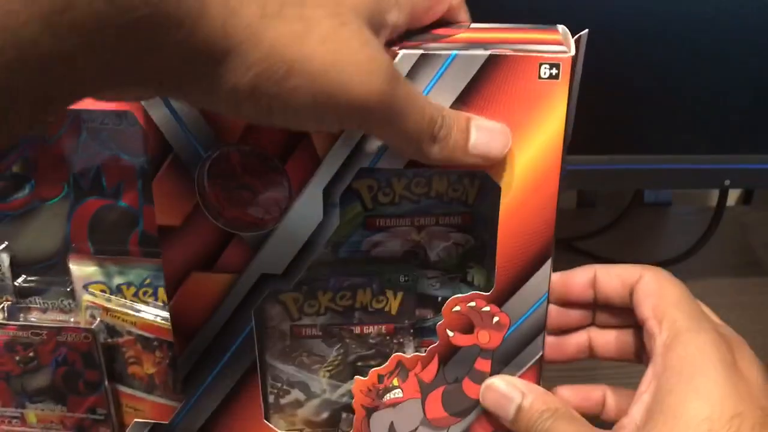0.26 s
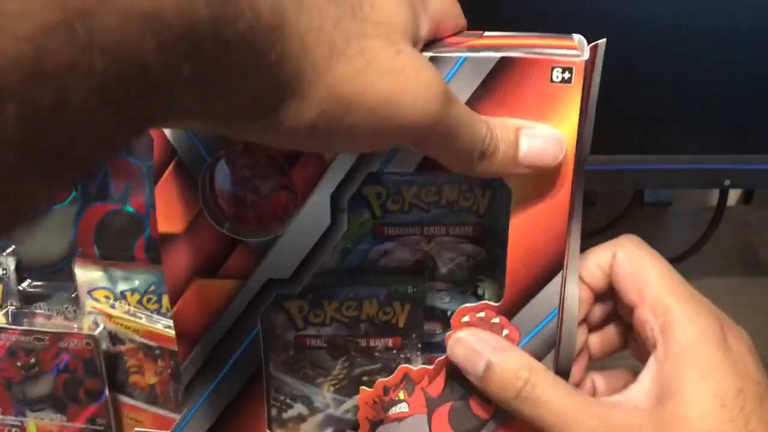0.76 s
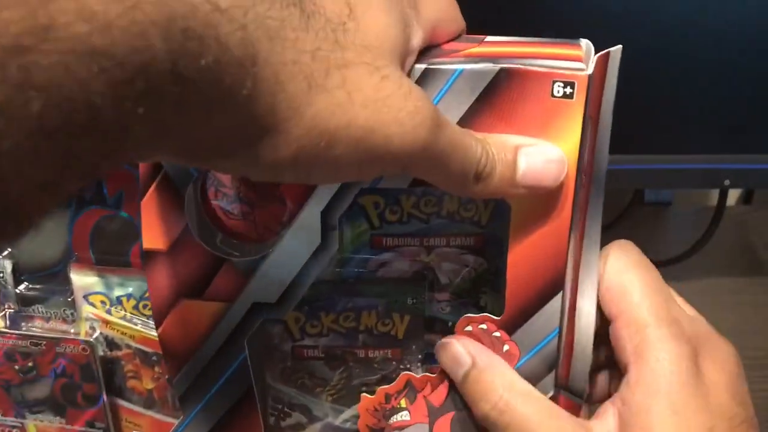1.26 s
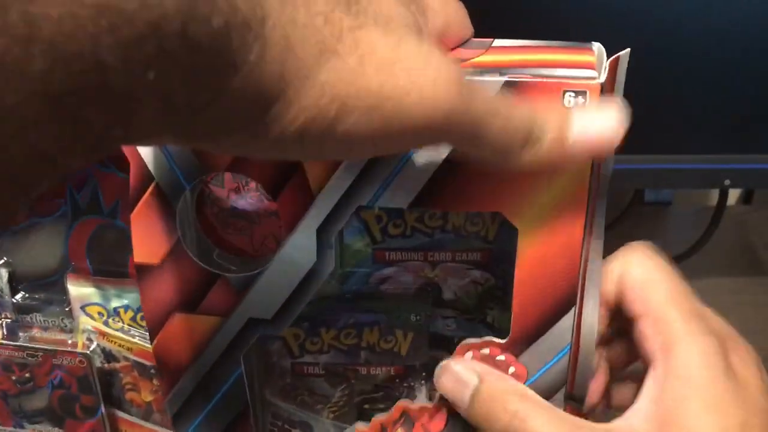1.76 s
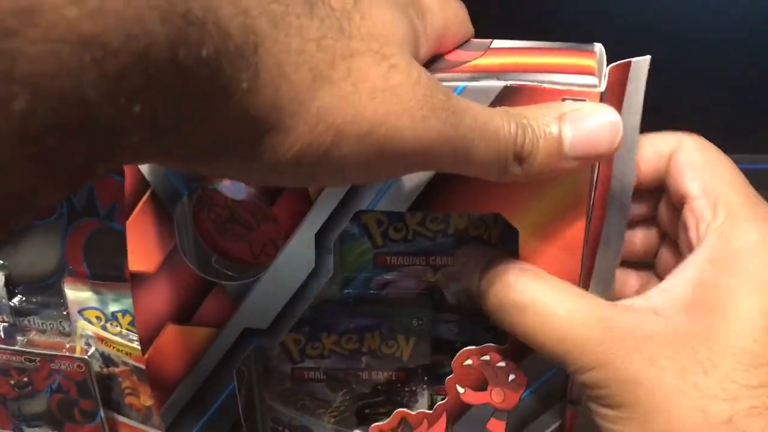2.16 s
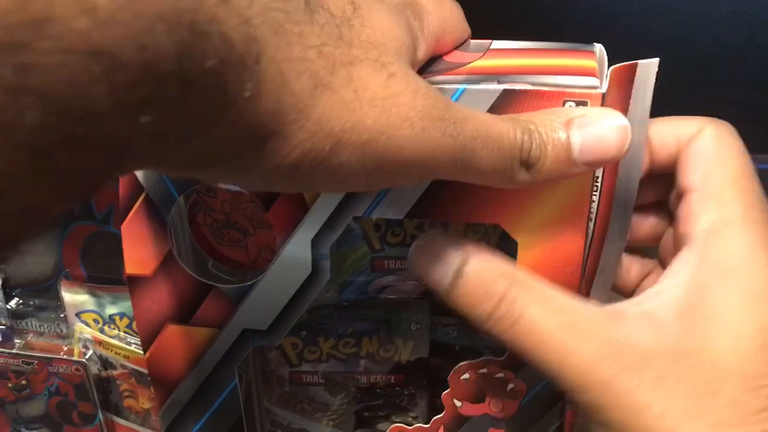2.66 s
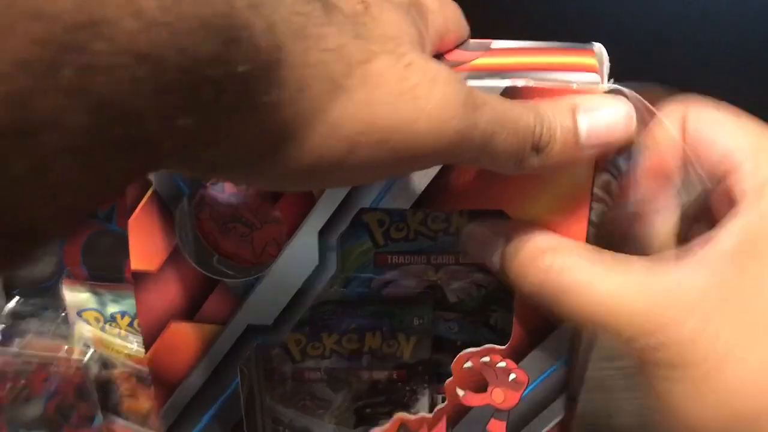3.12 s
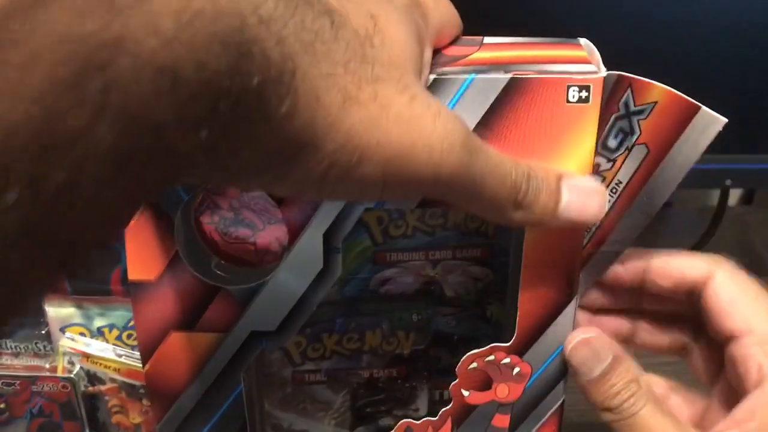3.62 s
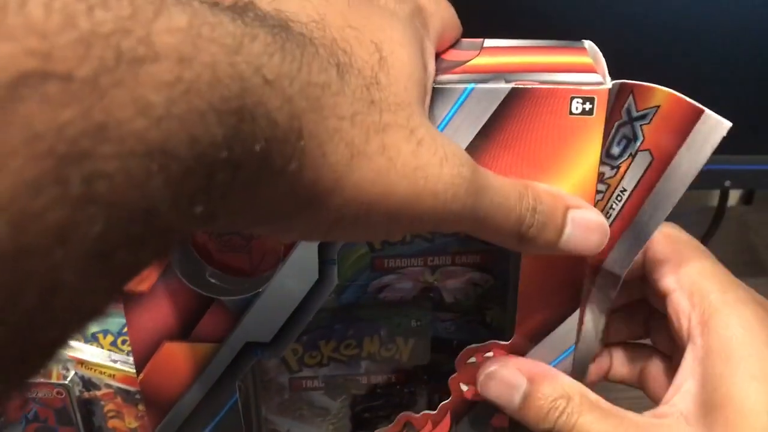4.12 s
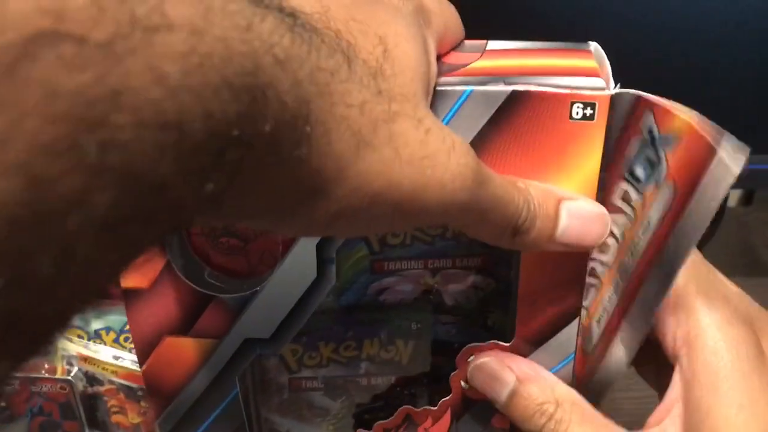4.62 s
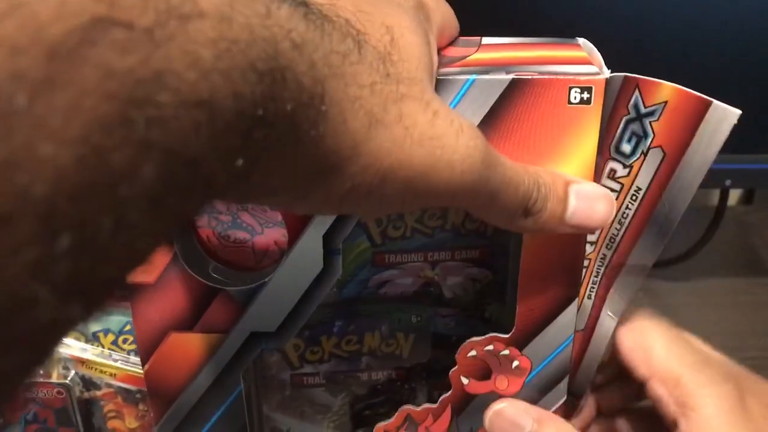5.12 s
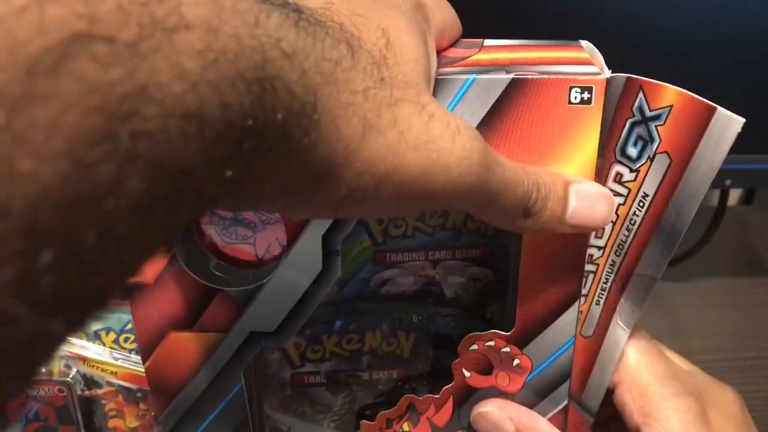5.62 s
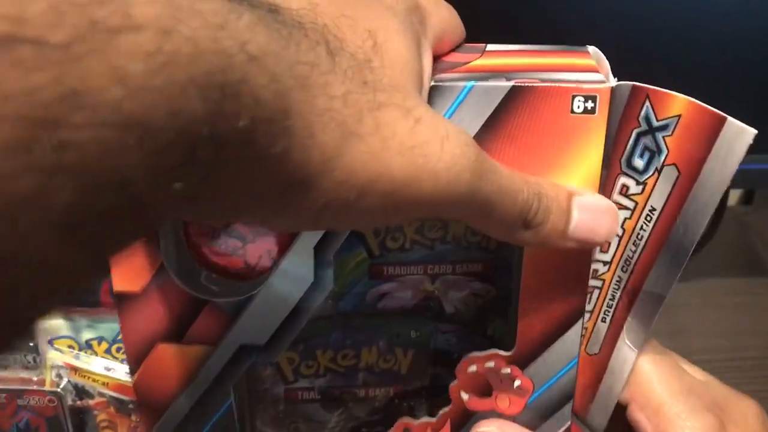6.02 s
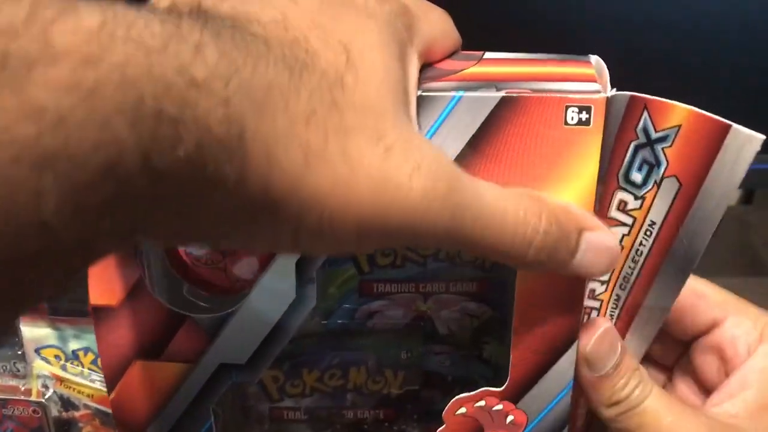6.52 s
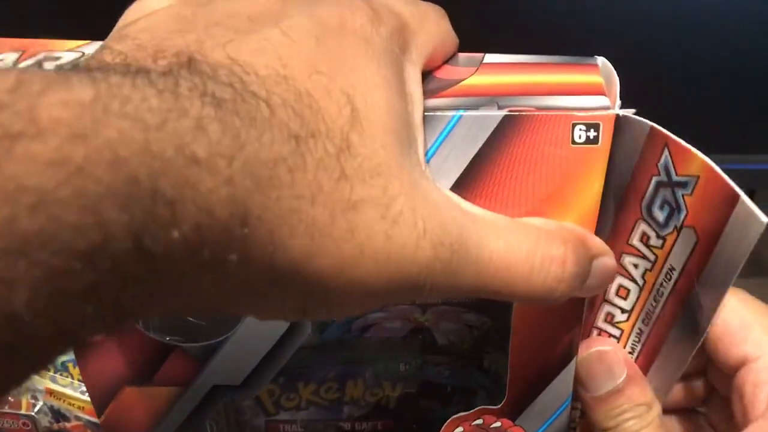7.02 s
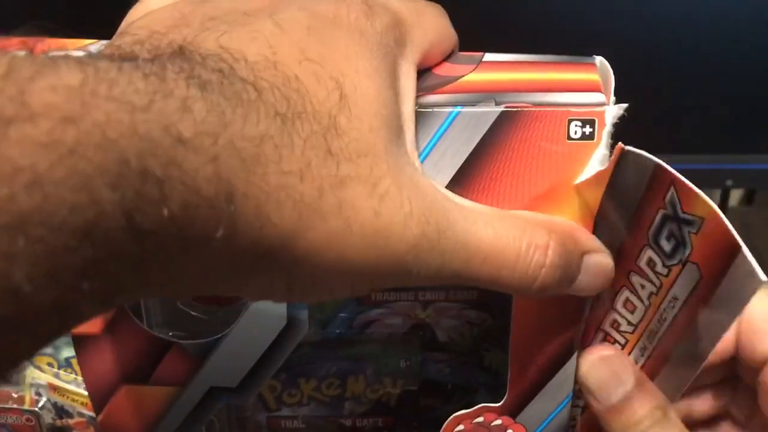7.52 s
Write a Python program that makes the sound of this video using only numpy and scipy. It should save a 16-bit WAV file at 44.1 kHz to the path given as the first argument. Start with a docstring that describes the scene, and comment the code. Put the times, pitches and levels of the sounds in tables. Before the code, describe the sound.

Hands work at a glued card flap: a brief scrape and soft snaps, a hard flurry of dull hollow cracks, then isolated sharp pops among quiet rubbing and creaks. A second flurry knocks the box midway, followed by thin ticks and short finger scuffs. Near the end, paper tears with a bright crack and fizz. Dry, close sound over low room hush, with a faint short tail.

```python
"""A short scrape and soft snaps open it, over a quiet room; then a hard burst of snaps knocks a hollow box.
Hands pry open the glued flap of a thin cardboard box close to a phone.
Snaps are noise rips, a damped pop and jolts that ring box modes; tearing and rubbing are coloured grains
shaped by strokes, and pushes make the panels creak. A flap pocket bands the hiss, the room adds hush and tail."""
import sys
import numpy as np
from scipy import signal
from scipy.fft import rfft, irfft, next_fast_len
from scipy.io import wavfile

SR = 44100
rng = np.random.default_rng(int(sys.argv[2]) if len(sys.argv) > 2 else 0)


def generate_wav(signal):
    """Clip the signal to [-1, 1] and save it as 16-bit WAV at the path in sys.argv[1]."""
    frames = np.transpose(np.atleast_2d(signal))
    scaled = np.clip(frames, -1, 1) * 32767
    pcm = np.round(scaled).astype(np.int16)
    wavfile.write(sys.argv[1], SR, pcm)


N = 342657

# Hush of the room: (frequency [Hz], relative level per Hz [dB])
ROOM_COLOUR = [(22, -12), (45, 7.5), (70, 8), (110, -4), (200, 3.5), (320, -18.5), (1600, -18),
               (16000, -44)]
# Response of the microphone: (frequency [Hz], gain [dB])
MIC_RESPONSE = [(4400, -1), (5000, -5), (5700, -2.5), (9000, -5), (10400, -7.5), (11500, -2), (15600, 0),
                (15900, -33)]
# Cavity modes of the hollow box: (frequency [Hz], level [dB], t60 [s])
CAVITY_MODES = [(64.7, -4.5, 0.083), (134, -11, 0.14), (177.7, -14.5, 0.16), (227.1, -10.5, 0.16),
                (348, 0.5, 0.036)]
# Both ends of the crowded, quickly damped panel modes: (frequency [Hz], level [dB], t60 [s])
PANEL_RANGE = [(358, -7, 0.05), (2314, -1, 0.0027)]
# Grip pushing the panels in: (start [s], hold [s], level [dB])
PUSHES = [(0.013, 0.1, -37), (0.388, 0.15, -18), (0.658, 0.029, -42), (0.788, 0.14, -34.5),
          (1.09, 0.022, -42.5), (1.274, 0.33, -43), (1.741, 0.049, -41.5), (1.88, 0.023, -49),
          (2.18, 0.19, -45.5), (2.6, 0.11, -42.5), (3.233, 0.024, -31), (3.368, 0.013, -39.5),
          (4.168, 0.05, -42), (4.374, 0.09, -17), (4.703, 0.29, -44), (5.274, 0.14, -45.5),
          (5.5, 0.48, -45.5), (6.084, 0.25, -46.5), (6.454, 0.15, -40.5), (6.964, 0.019, -50.5),
          (7.222, 0.015, -39.5), (7.631, 0.08, -41), (7.737, 0.04, -39)]
# Tearing fibres: (frequency [Hz], relative level per Hz [dB])
TEAR_COLOUR = [(1470, -64), (2500, 7), (2830, 0.5), (10200, 4), (12900, -2.5), (16000, -2)]
# Fingers rubbing card: (frequency [Hz], relative level per Hz [dB])
RUB_COLOUR = [(240, -2), (400, -5.5), (665, -8.5), (757, -4), (1610, -0.5), (9000, -17.5), (11700, -27),
              (19800, -120)]
# Fingers and torn paper sliding over the card, before the overhang:
# (start [s], length [s], crest [share of length, 0-1], scrape [dB], fibre fizz [dB])
STROKES = [(0, 0.11, 0.45, -37, -42.5), (0.115, 0.13, .45, -52, -50.5), (0.327, 0.13, .55, -46, -57),
           (0.414, 0.17, .4, -30.5, -49), (0.716, 0.16, 0.62, -31, -30.5), (1.055, 0.14, .4, -59, -50),
           (1.236, 0.32, 0.36, -47.5, -82), (1.595, 0.054, 0.46, -46, -74),
           (1.786, 0.092, 0.53, -41.5, -54), (1.854, 0.25, 0.59, -51, -43),
           (2.142, 0.061, 0.44, -42.5, -70), (2.172, 0.41, 0.28, -58, -50.5), (2.576, 0.34, 0.4, -56, -57),
           (2.8, 0.18, 0.5, -44, -60), (2.918, 0.32, 0.44, -50, -52.5), (3.205, 0.12, 0.18, -26.5, -27),
           (3.368, 0.1, 0.6, -52, -49.5), (3.643, 0.11, 0.24, -49, -45), (3.749, 0.04, 0.4, -43.5, -39.5),
           (3.826, 0.069, 0.74, -48.5, -61), (4.154, 0.15, 0.7, -49, -46.5), (4.36, 0.26, .4, -51, -58),
           (4.57, 0.16, 0.5, -48, -46.5), (4.658, 0.12, 0.47, -38, -32), (4.764, 0.16, 0.49, -33.5, -39),
           (4.918, 0.11, 0.44, -51, -46), (5.091, 0.19, 0.52, -47.5, -46), (5.325, 0.089, 0.5, -38, -63),
           (5.663, 0.1, 0.45, -43.5, -69), (5.772, 0.046, .55, -34.5, -55), (5.869, 0.036, 0.6, -38, -57),
           (5.954, 0.048, .4, -41.5, -59.5), (6.062, 0.06, 0.48, -40, -70),
           (6.17, 0.25, 0.36, -48.5, -41.5), (6.423, 0.15, 1, -33.5, -43.5),
           (6.567, 0.27, 0.34, -53.5, -76), (6.666, 0.44, 0.38, -62, -45.5), (6.948, 0.24, 0.1, -54, -42.5),
           (7.137, 0.12, 0.43, -52, -38), (7.23, 0.082, 0.66, -46, -32), (7.264, 0.27, 0.1, -53.5, -43),
           (7.619, 0.15, 0.67, -45.5, -42.5)]
# Buzz of the ripping corner: (start [s], end [s])
TORN_EDGE_SPAN = (7.235, 7.46)
# Glue and creases letting go; low centre = dull knock, high = thin tick:
# (time [s], strength [dB], colour centre [octaves from 2 kHz])
SNAPS = [(0.0317, -23, -0.37), (0.12, -19, -0.9), (0.3698, -18, -0.91), (0.3969, -6.5, -0.26),
         (0.4129, -8.5, -0.77), (0.4247, -8, -0.5), (0.4352, -8.5, -0.6), (0.4445, -9.0, -0.78),
         (0.451, -11.5, 0.3), (0.4627, -9, -0.19), (0.4756, -12, -0.8), (0.4987, -25, -0.82),
         (0.5347, -20, 0.69), (0.5712, -19, -0.2), (0.848, -12, -0.57), (0.932, -20, 1.56),
         (0.9541, -28.5, -0.64), (1.035, -30.0, -0.68), (1.053, -3.5, 0.79), (1.0955, -16.5, -0.73),
         (1.1638, -35.5, 2), (1.3243, -16.5, -1.35), (1.4196, -29.5, -0.0), (1.6312, -29.5, -0.47),
         (1.6598, -42.5, 2), (1.7537, -32.5, -1.4), (1.777, -28.5, 0.27), (1.8789, -22.5, -0.47),
         (1.914, -29, -1.6), (2.1195, -30, -0.87), (2.146, -32, -0.93), (2.1877, -31, 0.89),
         (2.2299, -25.5, -1.4), (2.2809, -21, -1.58), (2.3253, -23.5, -1.7), (2.3356, -30, 1.56),
         (2.353, -30.5, 2.0), (2.3753, -21.5, 1.06), (2.6417, -33.5, -1.5), (2.691, -29.0, 0.19),
         (2.714, -29.5, 0.35), (3.1456, -30.5, -0.93), (3.1939, -24, -0.4), (3.233, -1.5, 0.43),
         (3.3354, -10, -0.061), (3.3772, -17.5, -0.3), (3.647, -32.5, 0.17), (3.6606, -26, 0.39),
         (3.9564, -35, 0.033), (4.0738, -37, 0.65), (4.1688, -31.5, 0.073), (4.2169, -24, 0.91),
         (4.2963, -28.5, 0.75), (4.326, -31.5, -0.88), (4.353, -30.5, -0.9), (4.3834, -10, -0.28),
         (4.4069, -8, -0.7), (4.421, -9.5, -0.23), (4.4387, -7.5, -0.51), (4.455, -18, -0.8),
         (4.4748, -14.0, -1.2), (4.5018, -8, -0.54), (4.6352, -32.5, -1.24), (4.741, -20, 0.65),
         (4.75, -9.5, 1.12), (4.764, -23, 1.6), (4.7772, -10.5, 0.57), (4.9186, -20, -0.0),
         (4.9743, -24.5, -0.36), (5.0669, -34.5, -0.45), (5.2792, -25.5, 0.57), (5.3349, -20.0, 1.05),
         (5.3503, -22, 0.8), (5.4792, -30, -0.7), (5.5101, -28, -0.39), (5.5396, -31, -0.12),
         (5.5685, -27, -0.5), (5.6384, -22.5, 0.053), (5.8048, -21.5, 0.58), (5.9532, -23.5, 0.37),
         (6.15, -32.5, 0.89), (6.235, -19, 0.36), (7.1806, -28, 1.5), (7.2, -23, 1.27),
         (7.2319, -8.5, 0.64), (7.4944, -33, 0.61), (7.597, -36, 0.25), (7.6565, -17.5, 0.46),
         (7.7135, -18, -0.65), (7.7417, -28.5, 2.0)]
# Knock into the box, mid rip, treble rip: (place [octaves from 2 kHz], strength [dB])
SNAP_PARTS = [(-1.474, 8.5), (0.064, -2.3), (2.03, 8)]

ROOM_DB = -53
TOP_HZ = 16800
POCKET_S, POCKET_BACK = .00185, .25  # round trip under the flap, share reflected
# rise of a push, fade as the panel springs back, resting hold
PUSH_ATTACK_S, SPRING_BACK_T60_S, GRIP_DB = 0.014, 0.23, -56.5
PUSH_SAG_DB_PER_S = -13  # a held push slackens
CRACKLE_PER_S, CRACKLE_DB, CRACKLE_SPREAD_DB = 45, -11, 7
CRACKLE_CAP_DB = -44.5  # harder pressure makes the small creases no louder
TORN_EDGE_HZ, TORN_EDGE_WIDTH_HZ = 2210, 260  # width of each of two resonant passes
TORN_EDGE_DB = -6  # against the fizz
SNAP_FALL_DB_PER_OCT = 10  # a part weakens with its distance from the snap's centre
BASS_LAG_CYCLES = 2.513  # bending waves are slower in the bass, so low modes answer late


def undb(db):
    """Decibels to amplitude."""
    return 10 ** (np.asarray(db) / 20)


def unit(x):
    """Scale to an RMS of one."""
    return x / np.sqrt(np.mean(x ** 2))


def fade(seconds, t60):
    """Exponential decay that drops 60 dB in t60 seconds."""
    return np.exp(-np.log(1000) * seconds / t60)


def colour(x, points):
    """Shape the spectrum by (frequency [Hz], level [dB]) points on a log axis."""
    hz, db = np.transpose(points)
    size = next_fast_len(len(x))
    f = np.maximum(np.arange(size // 2 + 1) * SR / size, 1)
    gain = undb(np.interp(np.log(f), np.log(hz), db))
    return irfft(rfft(x, size) * gain, size)[:len(x)]


def band(x, lo_hz, hi_hz):
    """Keep the band between two frequencies."""
    sos = signal.butter(2, [lo_hz, hi_hz], "bandpass", fs=SR, output="sos")
    return signal.sosfilt(sos, x)


def sparse_breaks(per_s, spread_db):
    """Randomly timed breaks of uneven size."""
    size = undb(spread_db * np.minimum(rng.exponential(size=N), 3))
    return (rng.random(N) < per_s / SR) * size


def grains(per_s, spread_db, t60):
    """Dense tiny breaks, each a short puff of noise, over a finer continuous bed."""
    puff = signal.lfilter([1], [1, -fade(1 / SR, t60)], sparse_breaks(per_s, spread_db))
    return unit((1 + puff) * rng.standard_normal(N))


def room():
    """Steady hush with a low rumble, from coloured noise."""
    return unit(colour(rng.standard_normal(N), ROOM_COLOUR)) * undb(ROOM_DB)


def room_echo(near):
    """Walls and desk return a faint, duller tail of decaying noise."""
    t = np.arange(12000) / SR
    tail = band(rng.standard_normal(len(t)), 113, 5000) * fade(t, 0.44) * (t > .004)
    echo = signal.oaconvolve(near, tail / np.sqrt(np.sum(tail ** 2)))[:N]
    return undb(-21.5) * echo


def pocket(x):
    """Sound bounces between flap and box wall, which bands the hiss."""
    back = np.zeros(int(POCKET_S * SR) + 1)
    back[0], back[-1] = 1, -POCKET_BACK
    return signal.lfilter([np.sqrt(1 - POCKET_BACK ** 2)], back, x)


def box_modes(count=26):
    """The cavity modes, then unevenly spaced panel modes."""
    lo, hi = np.array(PANEL_RANGE)
    step = (np.arange(count) + rng.random(count))[:, None] / count
    return np.vstack([CAVITY_MODES, lo + (hi - lo) * step ** 1.349])


def ring(force, modes):
    """The box answers one row of force per mode with damped resonances; it radiates little deep bass."""
    out = 0
    for k, (row, (hz, db, t60)) in enumerate(zip(force, modes)):
        turn = 2 * np.pi * hz / SR
        pole = fade(1 / SR, t60)
        mode = signal.lfilter([np.sin(turn)], [1, -2 * pole * np.cos(turn), pole ** 2], row)
        out = out + (-1) ** k * undb(db) * mode
    return band(out, 123, 4000)


def pushes():
    """Each push rises, slackens while held and dies as the panel springs back; the resting grip never stops."""
    t = np.arange(N) / SR
    power = undb(GRIP_DB) ** 2
    for s, hold, db in PUSHES:
        rise = np.clip((t - s) / PUSH_ATTACK_S, 0, 1)
        sag = undb(PUSH_SAG_DB_PER_S * np.clip(t - s, 0, hold))
        release = fade(np.maximum(t - s - PUSH_ATTACK_S - hold, 0), SPRING_BACK_T60_S)
        power = power + (undb(db) * rise * sag * release) ** 2
    return np.sqrt(power)


def strokes(edge=0.93, overhang=1.032, settle_t60=0.034):
    """Pressure of each stroke follows a blunt, leaning arch; overlapping strokes add in power."""
    power = np.zeros((2, N))  # scrape, fizz
    for s, length, crest, *db in STROKES:
        i, n = int(s * SR), int(length * overhang * SR)
        turn = np.interp(np.arange(n) / n, [0, np.clip(crest, .05, .95), 1], [0, np.pi / 2, np.pi])
        arch = np.abs(np.sin(turn[:N - i])) ** (2 * edge)
        power[:, i:i + n] += undb(db)[:, None] ** 2 * arch
    settle = fade(1 / SR, settle_t60)  # the card keeps rustling a moment after the finger lifts
    return np.sqrt(signal.lfilter([1 - settle], [1, -settle], power))


def crackle(pressure, modes):
    """Sparse small creases give way under the fingers; each tick favours other panel modes."""
    size = sparse_breaks(CRACKLE_PER_S, CRACKLE_SPREAD_DB) * undb(CRACKLE_DB)
    size = size * np.minimum(pressure, undb(CRACKLE_CAP_DB))
    return size * rng.standard_normal((len(modes), N)) * (modes[:, :1] > 700)


def torn_edge(fizz):
    """While the corner rips, the loose strip buzzes at one pitch: grains through a narrow resonance."""
    t = np.arange(N) / SR
    start, end = TORN_EDGE_SPAN
    strip = signal.iirpeak(TORN_EDGE_HZ, TORN_EDGE_HZ / TORN_EDGE_WIDTH_HZ, SR)
    buzz = signal.lfilter(*strip, signal.lfilter(*strip, grains(52, 3.4, 0.02)))
    return unit(buzz) * fizz * undb(TORN_EDGE_DB) * (t > start) * (t < end)


def hands(modes):
    """Tearing is bright fizz, rubbing a coarser scrape; rubbing and flexing also push on the box."""
    flex = pushes()
    scrape, fizz = strokes()
    tear = unit(colour(grains(220, 1.0, 0.0073), TEAR_COLOUR)) * (fizz + undb(-63))
    # bending card creaks faintly along with the flexing
    rub = unit(colour(grains(150, 2.2, 0.011), RUB_COLOUR)) * np.hypot(scrape, flex * undb(-18.5))
    bend = band(grains(160, 0.68, 0.044), 60, 927) * flex * undb(-22.5)
    ticks = crackle(np.hypot(scrape, flex * undb(-4)), modes)
    return tear + rub + torn_edge(fizz), bend + undb(-38.5) * rub + ticks


def at_snaps(at, size, shape):
    """Place one shape at every snap, scaled to its size."""
    strikes = np.zeros(N)
    strikes[at] = size
    return signal.oaconvolve(strikes, shape)[:N]


def snap_rip(t, t60, tail_db=-24):
    """Fast ripping onset and decay, with a quiet paper after-rustle."""
    return (1 - np.exp(-t / 0.00013)) * (fade(t, t60) + undb(tail_db) * fade(t, 0.21))


def snap_knock(at, box_db, modes, knock_t60=0.0078, knock_db=-15, place_db=6.0):
    """Splintering jolts the modes, each snap favouring others; low modes answer late."""
    place = undb(place_db * rng.standard_normal((len(at), len(modes))))
    # a sudden break hardly moves the big slow modes
    stiff = np.minimum(modes[:, 0] / 600, 1) ** 0.7
    force = np.zeros((len(modes), N))
    decay = fade(np.arange(600) / SR, knock_t60)
    for i, size in zip(at, place * stiff * undb(box_db + knock_db)[:, None]):
        jolt = rng.standard_normal((len(modes), 600)) * decay  # differs from mode to mode
        force[:, i:i + 600] += size[:, None] * jolt / np.sqrt(np.mean(np.sum(jolt ** 2, axis=1)))
    return np.array([np.roll(row, int(BASS_LAG_CYCLES * SR / hz)) for row, hz in zip(force, modes[:, 0])])


def snaps(modes, pop_hz=1150, pop_db=-9.0):
    """Each snap is a short rip in two bands, one panel pop and a knock that sets the modes ringing."""
    t = np.arange(4000) / SR
    s, db, centre = np.transpose(SNAPS)
    at = (s * SR).astype(int)
    box_db, mid_db, top_db = (db + part_db - SNAP_FALL_DB_PER_OCT * np.abs(centre - octave)
                              for octave, part_db in SNAP_PARTS)
    mid = unit(band(rng.standard_normal(N), 710, 3560)) * at_snaps(at, undb(mid_db), snap_rip(t, 0.017))
    top = unit(band(rng.standard_normal(N), 4250, 13800)) * at_snaps(at, undb(top_db), snap_rip(t, 0.011))
    pop_shape = np.sin(2 * np.pi * pop_hz * t) * fade(t, 0.0083)
    pop = at_snaps(at, undb(box_db + pop_db), pop_shape)
    return mid + top + pop, snap_knock(at, box_db, modes)


def scene():
    """Snaps and hands sound through the pocket and ring the box, over the room and its tail."""
    modes = box_modes()
    rip, knock = snaps(modes)
    scrape, flex = hands(modes)
    near = pocket(rip + scrape) + ring(knock + flex, modes)
    return (near + room_echo(near) + room())[None]


def record(dry):
    """The microphone has dips in the treble and the top is cut."""
    top_cut = signal.ellip(10, .2, 70, TOP_HZ, fs=SR, output="sos")
    return signal.sosfilt(top_cut, colour(dry[0], MIC_RESPONSE))[None]


dry = scene()
out = record(dry)
generate_wav(out)
```